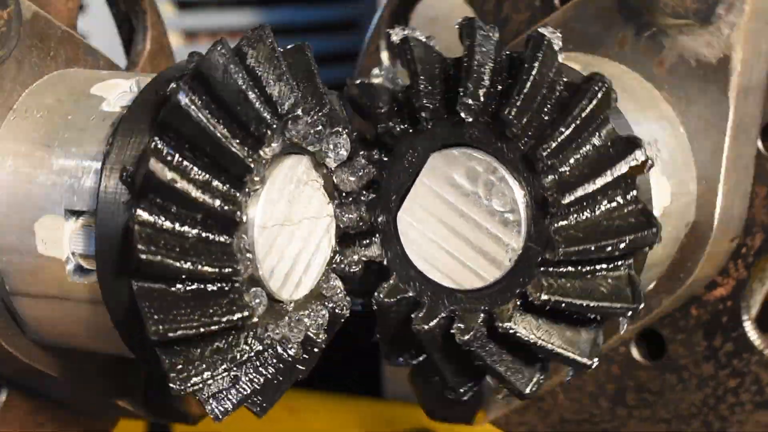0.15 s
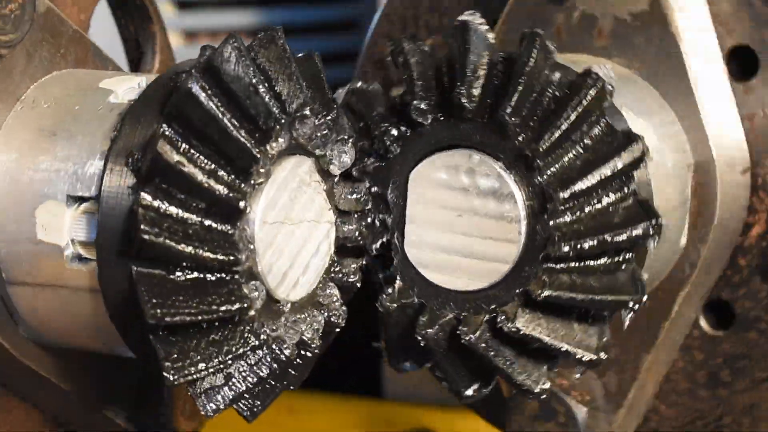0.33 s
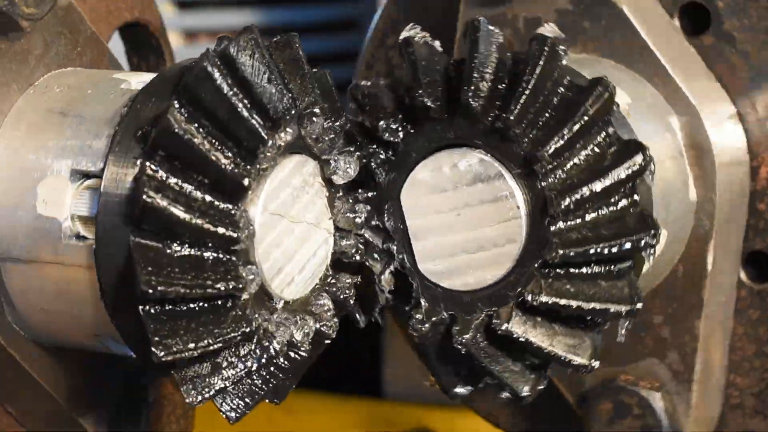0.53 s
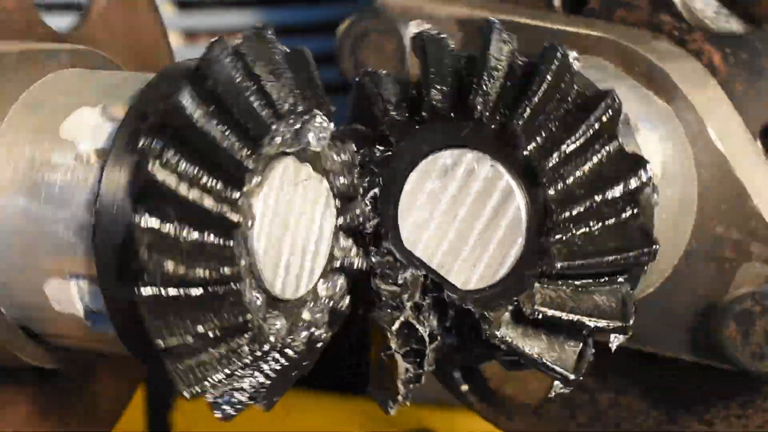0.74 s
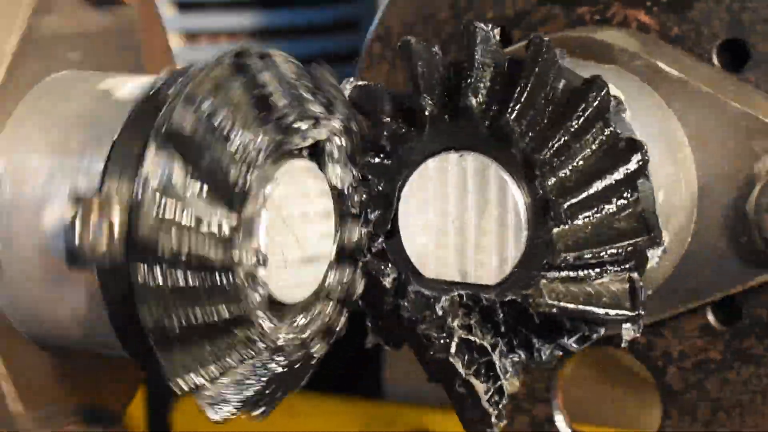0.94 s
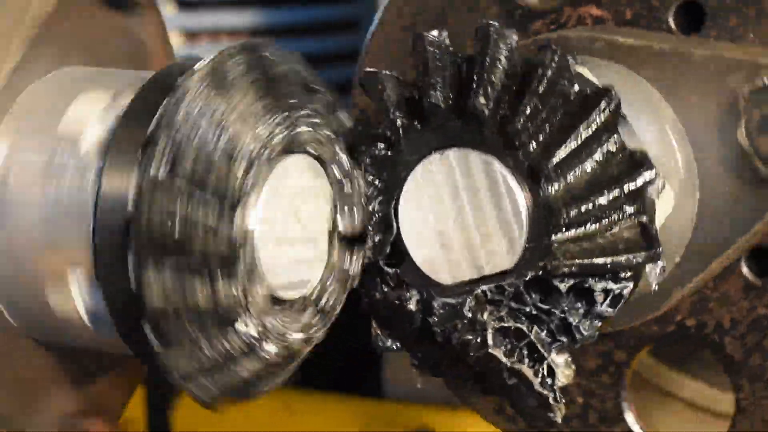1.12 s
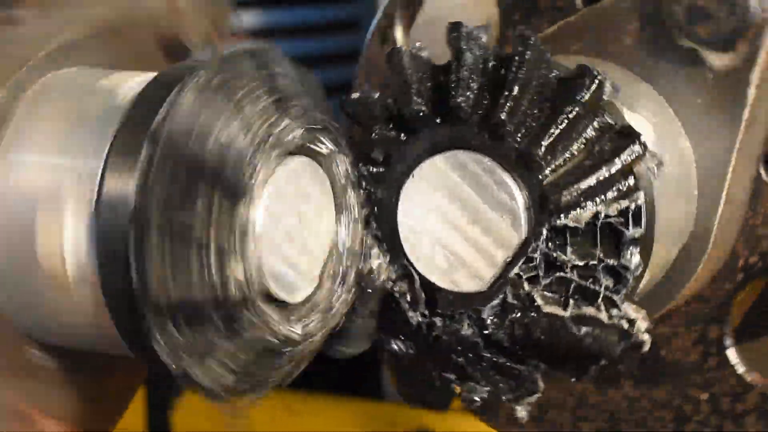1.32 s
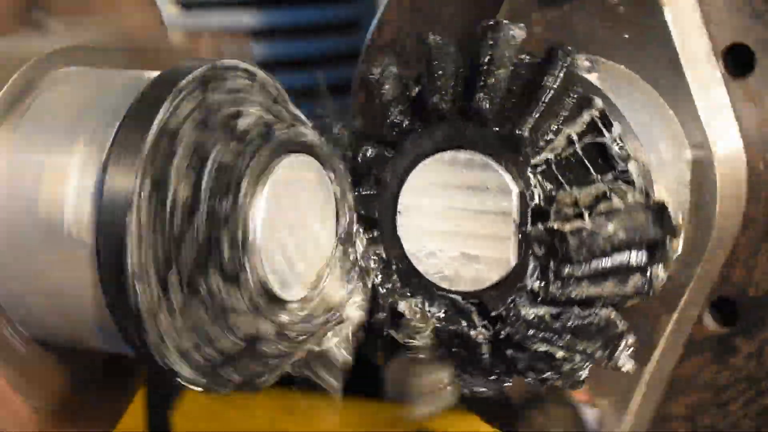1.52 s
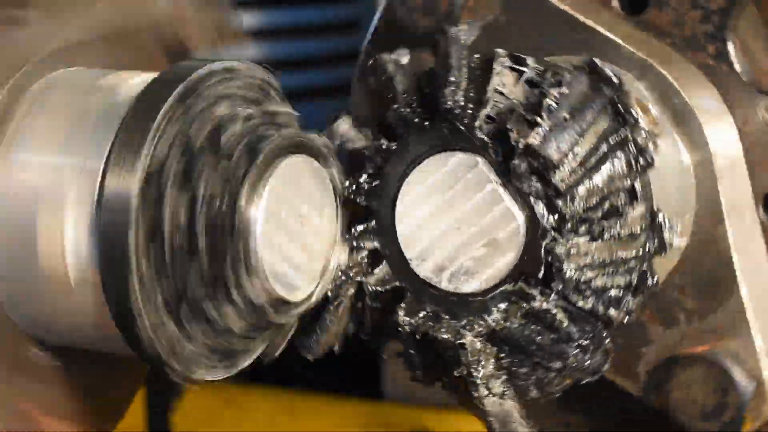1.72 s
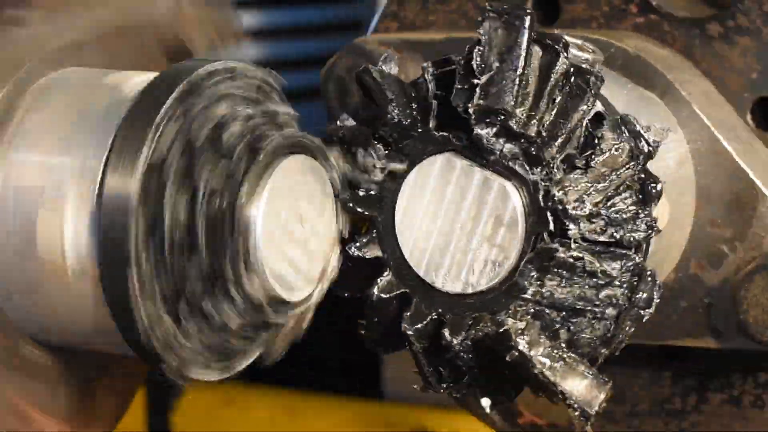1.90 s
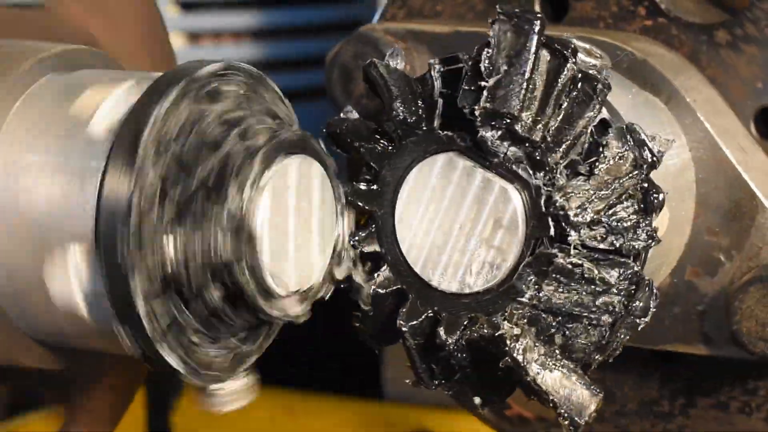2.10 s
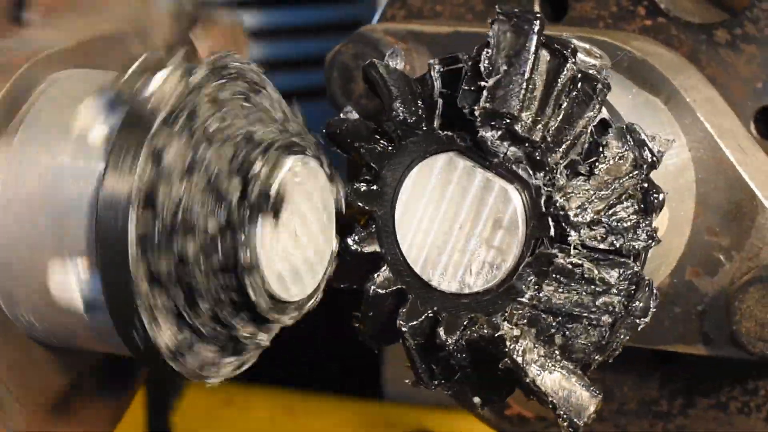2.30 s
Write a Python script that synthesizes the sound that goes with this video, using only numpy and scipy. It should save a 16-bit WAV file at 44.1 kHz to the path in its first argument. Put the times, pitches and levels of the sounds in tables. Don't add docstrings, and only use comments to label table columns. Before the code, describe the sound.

Close-miked gear teeth snap brightly, each crack followed by a short dull thud from the metal frame; the snaps crowd into rough grinding clatter, then fade to weak grazing ticks and hum in a short room echo.

```python
import sys
import numpy as np
from scipy import signal
from scipy.fft import rfft, irfft
from scipy.io import wavfile

SR = 44100
rng = np.random.default_rng(int(sys.argv[2]) if len(sys.argv) > 2 else 0)


def bounce(signal):
    frames = np.transpose(np.atleast_2d(signal))
    limited = np.clip(frames, -1, 1)
    pcm = np.round(limited * 32767).astype(np.int16)
    wavfile.write(sys.argv[1], SR, pcm)


def rack_gain(trim_db):
    fader = np.asarray(trim_db, float)
    return 10 ** (fader / 20)


N = 103635

# (frequency [Hz], level [dB])
AIR_SPECTRUM = [(25, -3), (90, -6), (350, -6.5), (1200, -8.5), (2300, -12.5), (16500, -34)]
AIR_DB = -56.5
# (frequency [Hz], level [dB])
MOTOR_HUM = [(243, -65), (350, -63.5)]
FREE_S, FREE_DB = 1.84, 19
COAST_S, COAST_DB_PER_S = 1.96, 18

# (time [s], frame shaking [dB], grit [dB])
MESH_CHEWING = [(0.198, -76, -77), (0.499, -46, -89), (.66, -50, -46.5), (.72, -24.5, -47.5),
                (.93, -34.5, -43), (1.06, -21.5, -39), (1.13, -34, -46), (1.22, -25, -43),
                (1.3, -25.5, -42), (1.38, -19, -41.5), (1.422, -18, -36), (1.47, -21, -35),
                (1.528, -27.5, -47), (1.618, -24, -35), (1.68, -26, -53), (1.74, -42.5, -53),
                (2.0, -36.5, -63.5), (2.35, -44.5, -66)]
# (frequency [Hz], level under a thud [dB], level under shaking [dB], T60 [s])
FRAME_MODES = [(79, -68, -13.5, 0.9), (178, -34, -26, 1), (207.5, -33, -14.5, 0.58), (247.8, -17, -4, 0.14),
               (319, -18, -6, 0.065), (354.5, -17.5, -1, 0.31), (459, -8.5, -1.5, 0.024),
               (531, -11.5, -5.5, 0.057), (592, -12.5, -5, 0.08), (676.5, -2.5, -7, 0.069),
               (731, -1.5, -27, 0.04), (772, -7, -16, 0.092), (869, -8.5, -19, 0.035),
               (1533, -13.5, -49, 0.026)]
# (time [s], level [dB], pitch [Hz])
SHAFT_LURCHES = [(.535, -38, 350), (0.681, -18.5, 340), (1.072, -29, 360), (1.256, -18, 363),
                 (1.407, -9, 207), (1.645, -13, 198), (1.795, -24, 345), (1.87, -22.5, 253),
                 (1.981, -21, 247), (1.931, -26.5, 245), (1.33, -19.5, 360), (1.561, -22, 352),
                 (2.149, -34, 247), (2.23, -30.5, 243)]
THUD_DELAY_S, THUD_DB, THUD_SOFT_HZ = 0.004087, -1, 1570
JOLTS_PER_S, JOLT_SPREAD_DB, LURCH_WIDTH_HZ = 900, 4, 46

# (frequency [Hz], level [dB])
GRIT_SPECTRUM = [(700, 8.5), (1500, 1.5), (3000, 4), (7000, 9.5), (14000, -7)]
GRAINS_PER_S, GRAIN_SPREAD_DB, GRAIN_CYCLES, GRIT_CLUMP_DB = 3500, 2.5, 7.0, 4.0
GRIT_PITCHES = 20

# (time [s], crack level [dB], colour [Hz],
# thud level [dB])
SNAPPING_TEETH = [(0.2176, -38, 8650, -53), (0.2258, -35, 6400, -57), (0.244, -8, 11100, -20),
                  (0.2653, -12.5, 10000, -47), (0.2743, -23.5, 7060, -38), (0.2838, -14.5, 9100, -28),
                  (0.3422, -34, 6000, -36), (0.3643, -10, 6500, -14), (0.5122, -39.5, 5930, -30),
                  (0.5802, -37.5, 8250, -50), (0.5983, -5.5, 7300, -14.5), (0.6121, -30, 5640, -55),
                  (0.6798, -16, 4960, -11), (0.7015, -25.5, 6330, -27), (0.7622, -13.5, 7700, -19),
                  (0.7896, -10, 9800, -50), (0.7974, -23, 9200, -33), (0.8066, -5.5, 9500, -11.5),
                  (0.852, -4, 7800, -14.5), (0.9072, -7, 8700, -16.5),
                  (0.9599, -14, 7060, -30), (0.9779, -21.5, 5850, -12), (0.9903, -16.5, 8150, -20),
                  (1.0058, -14, 6000, -29), (1.018, -33, 5000, -18), (1.0371, -13, 4570, -10.5),
                  (1.0669, -20, 8400, -18), (1.0732, -26, 8160, -29), (1.0898, -9.5, 9000, -50),
                  (1.1104, -22, 8300, -50), (1.132, -23, 9500, -25), (1.1444, -25, 8300, -23),
                  (1.1571, -12, 9700, -12.5), (1.1621, -13, 6150, -14), (1.181, -21.5, 8250, -15),
                  (1.1947, -6.5, 7800, -12), (1.2548, -18, 6500, -16), (1.2765, -36, 8700, -19.5),
                  (1.2876, -8.5, 6200, -49), (1.3005, -22, 5960, -21), (1.3151, -17.5, 6500, -15),
                  (1.3243, -11, 5450, -16), (1.3349, -23, 4540, -34),
                  (1.404, -30, 7660, -14.5), (1.4175, -39, 9000, -15.5), (1.43, -13, 9700, -13.5),
                   (1.4502, -26, 4400, -16.5), (1.4598, -18, 6360, -31), (1.4673, -10.5, 7400, -21),
                   (1.4793, -27.5, 4320, -24), (1.5144, -29, 3470, -29.5), (1.5515, -22, 6140, -17.5),
                   (1.5696, -9, 5130, -12.5), (1.5728, -17, 6900, -13), (1.5793, -13.5, 9990, -59),
                   (1.5889, -20, 8950, -25), (1.6005, -22, 8000, -36), (1.6065, -17, 8550, -24.5),
                   (1.6194, -27, 8100, -25), (1.6348, -10, 9200, -42), (1.6426, -25, 6900, -36),
                   (1.6463, -19.5, 8000, -18.5),
                  (1.7308, -31, 8050, -48), (1.7355, -27, 5300, -42), (1.7625, -32.5, 7200, -50),
                 (1.7899, -27.5, 4530, -23.5), (1.7996, -16, 6500, -21), (1.8451, -35, 4740, -27),
                 (1.8654, -32, 5700, -28.5), (1.9057, -34, 5840, -66), (1.9128, -31, 5700, -39),
                 (1.9202, -31, 5150, -59), (1.9748, -29.5, 5230, -25.5), (1.9873, -36.5, 3850, -33.5),
                 (2.032, -36.5, 6100, -41), (2.0403, -34, 4900, -52), (2.056, -39, 5270, -97),
                 (2.0822, -27, 6740, -69), (2.1312, -31.5, 7840, -63), (2.1367, -32.5, 6900, -41),
                 (2.2259, -43, 3500, -35), (2.2404, -32.5, 7450, -50), (2.2515, -34, 7900, -45),
                 (2.3401, -44.5, 4960, -52)]
# (time [s], crack level [dB], colour [Hz])
SPLINTERS = [(0.2205, -44, 8900), (0.2441, -27, 1320), (0.5984, -18.5, 1860), (0.7624, -20, 3060),
             (1.1385, -25, 9000), (1.15, -32, 8500), (1.1535, -28, 9000), (0.2375, -43, 6100),
             (0.521, -51, 5000), (0.531, -46, 5000), (0.9975, -36, 9500), (1.0785, -29, 8000),
             (1.0855, -37, 6980), (1.2595, -27, 7000), (1.3655, -25, 4900), (1.3715, -25, 8900),
             (1.375, -31, 9900), (1.392, -35, 9000), (1.3985, -26, 7600), (1.563, -24, 6960),
             (1.566, -19, 8000), (1.5965, -16, 4400), (1.6035, -20.5, 5000), (1.6255, -18, 3970),
             (1.653, -22, 5840), (1.67, -29, 4960), (1.852, -47, 6030), (1.942, -42, 5500)]
# (frequency [Hz], density [dB per Hz])
CRACK_SPECTRUM = [(900, -2), (2600, -1.5), (6700, -7), (13000, -7), (16500, -16.5)]
CRACK_HOLD_S, CRACK_T60_S, CRACK_Q, CRACK_WIDE_DB = 0.0005, 0.008, 3.0, -2.0
CRACK_SAMPLES = 1024

# (frequency [Hz], T60 [s], level [dB])
WORKSHOP = [(216, 0.25, 7.5), (710, 0.38, 4), (1960, 0.37, -1), (5550, 0.29, -6), (8800, 0.25, 0),
            (14900, 0.3, -11)]
BRACKETS_HZ = [2960, 6060, 7160]
BRACKET_Q, BRACKET_DB = 8, -5
ROOM_DB, ROOM_GAP_S = -8.5, 0.0051

# (time [s], level [dB], frequency [Hz], T60 [s])
SKIDS = [(0.37, -38.5, 5300, 0.28), (0.39, -45, 7700, 0.27), (0.61, -32, 5500, 0.34),
         (1.396, -37.5, 1730, 0.38), (2.085, -50, 7100, 0.27), (2.14, -44, 6400, 0.16),
         (2.275, -45, 8100, 0.17), (3, -36, 5500, 0.14), (1.2, -31, 5400, 0.095), (0.86, -24, 11000, 0.079),
         (2.313, -56, 4800, .15)]
SKID_Q, SKID_RISE_S = 14.0, 0.0037

# (frequency [Hz], level [dB], T60 [s])
CHIP_MODES = [
    (2570, -44.5, 0.0054),
    (3470, -42, 0.0024),
    (1355, -62, 0.28),
]
CHIP_S, SCRAPE_DECAY_S = 1.763, 0.008

MIC_LOW_HZ, RECORDER_TOP_HZ, PEAK_LIMIT = 60, 17200, 0.7


def rms_one(x):
    return x / np.sqrt(np.mean(x ** 2) + 1e-20)


def at_hz(points, hz, axis=1):
    p = np.array(points)
    return np.interp(np.log(np.maximum(hz, 1)), np.log(p[:, 0]), p[:, axis])


def colour(x, points):
    size = x.shape[-1]
    gain = rack_gain(at_hz(points, np.fft.rfftfreq(size, 1 / SR)))
    return irfft(rfft(x) * gain, size)


def ring(clicks, hz, t60):
    radius = rack_gain(-60 / (t60 * SR))
    angle = 2 * np.pi * hz / SR
    poles = [1, -2 * radius * np.cos(angle), radius * radius]
    return signal.lfilter([0, np.sin(angle)], poles, clicks + 1e-18)


def soften(x, hz):
    return signal.sosfilt(signal.butter(2, hz, fs=SR, output="sos"), x)


def grains(per_s, spread_db):
    sizes = rack_gain(spread_db * np.minimum(rng.exponential(1, N), 5))
    signs = rng.choice([-1, 1], N)
    return sizes * signs * (rng.random(N) < per_s / SR)


def background():
    t = np.arange(N) / SR
    hum = sum(rack_gain(db) * rms_one(ring(rng.standard_normal(N), hz, 2.5)) for hz, db in MOTOR_HUM)
    unload = rack_gain(FREE_DB * np.clip((t - FREE_S) * 5 + 1, 0, 1))
    coast = rack_gain(-COAST_DB_PER_S * np.maximum(t - COAST_S, 0))
    air = rack_gain(AIR_DB) * rms_one(colour(rng.standard_normal(N), AIR_SPECTRUM))
    return air + unload * coast * hum


def frame(snaps, shake_db):
    thud_at = ((snaps[:, 0] + THUD_DELAY_S) * SR).astype(int)
    luck_db = 3.0 * rng.standard_normal((len(snaps), len(FRAME_MODES)))
    jolts = grains(JOLTS_PER_S, JOLT_SPREAD_DB)
    lurch_s, lurch_db, lurch_hz = np.transpose(SHAFT_LURCHES)
    lurch_at = (lurch_s * SR).astype(int)
    out = 0
    for k, (hz, thud_db, db, t60) in enumerate(FRAME_MODES):
        hail = jolts * rng.uniform(-1.01, 1, N)
        clicks = rack_gain(db + shake_db) * hail / ring(hail, hz, t60).std()
        clicks[thud_at] += rack_gain(snaps[:, 3] + THUD_DB + thud_db + luck_db[:, k]) * (-1) ** k
        clicks[lurch_at] += rack_gain(lurch_db + db) / (1 + ((hz - lurch_hz) / LURCH_WIDTH_HZ) ** 2)
        out = out + ring(clicks, hz, t60)
    no_drift = signal.lfilter([1, -1], [1, -0.97], out)
    return soften(no_drift, THUD_SOFT_HZ)


def grit(grit_db):
    clumps = rms_one(soften(rng.standard_normal(N), 37))
    ticks = grains(GRAINS_PER_S * rack_gain(GRIT_CLUMP_DB * clumps), GRAIN_SPREAD_DB)
    dealt = rng.integers(0, GRIT_PITCHES, N)
    out = 0
    for k, hz in enumerate(np.geomspace(700, 15000, GRIT_PITCHES)):
        level = rack_gain(at_hz(GRIT_SPECTRUM, hz)) * np.sqrt(hz)
        out = out + level * ring(ticks * (dealt == k), hz, GRAIN_CYCLES / hz)
    return rack_gain(grit_db) * rms_one(out)


def cracks(snaps):
    out = np.zeros((2, N + CRACK_SAMPLES))
    t = np.arange(CRACK_SAMPLES) / SR
    shape = np.minimum(t * 8000, 1) * rack_gain(-60 * np.maximum(t - CRACK_HOLD_S, 0) / CRACK_T60_S)
    shape = shape + rack_gain(-11 - 60 * t / 0.026)
    noise = colour(rng.standard_normal((len(snaps), CRACK_SAMPLES)), CRACK_SPECTRUM)
    pulse = np.roll(colour(1.0 * (t == 0), CRACK_SPECTRUM), 64)
    for (s, db, hz, *_), splintering in zip(snaps, noise):
        high_pass = signal.butter(3, hz / 2.14, "high", fs=SR)
        wide = signal.lfilter(*high_pass, [splintering, pulse])
        own = signal.lfilter(*signal.iirpeak(hz, CRACK_Q, SR), wide)
        burst, clean = [rms_one(o) + rack_gain(CRACK_WIDE_DB) * rms_one(w) for o, w in zip(own, wide)]
        burst = shape * burst
        burst = burst / burst[:120].std()
        to_walls = 0.8 * rms_one(clean) * burst.std() + burst / 4
        start = int(s * SR)
        out[:, start:start + CRACK_SAMPLES] += rack_gain(db) * np.array([burst, to_walls])
    return out[:, :N]


def shop(x):
    size = SR // 2
    edges = 60 * 2 ** np.arange(0, 8.3, 0.5)
    t = np.arange(size) / SR
    white = rng.standard_normal((2, size))
    tail = 0
    for k, (low, high) in enumerate(zip(edges, edges[1:])):
        hz = np.sqrt(low * high)
        band_pass = signal.butter(2, [low, high], "band", fs=SR, output="sos")
        band = signal.sosfilt(band_pass, white[k % 2])
        tail = tail + band * rack_gain(at_hz(WORKSHOP, hz, axis=2) - 60 * t / at_hz(WORKSHOP, hz))
    steel = sum(signal.lfilter(*signal.iirpeak(hz, BRACKET_Q, SR), tail) for hz in BRACKETS_HZ)
    tail = tail + rack_gain(BRACKET_DB) * steel
    tail = tail * np.clip(t / ROOM_GAP_S - 1, 0, 1)
    tail = tail / np.sqrt(np.sum(white[0] ** 2) / 20)
    return rack_gain(ROOM_DB) * signal.fftconvolve(x, tail)[:N]


def skids():
    t, out = np.arange(N) / SR, 0
    for s, db, hz, t60 in SKIDS:
        late = np.maximum(t - s, 0)
        hiss = rms_one(signal.lfilter(*signal.iirpeak(hz, SKID_Q, SR), rng.standard_normal(N)))
        out = out + hiss * np.minimum(late / SKID_RISE_S, 1) * rack_gain(db - 60 * late / t60)
    return out


def chip():
    late = np.arange(N) / SR - CHIP_S
    scrape = rng.standard_normal(N) * (late > 0) * np.exp(-np.abs(late) / SCRAPE_DECAY_S)
    return sum(rack_gain(db) * ring(scrape, hz, t60) for hz, db, t60 in CHIP_MODES)


def scene():
    t = np.arange(N) / SR
    snaps = np.array(SNAPPING_TEETH)
    chew_s, shake, gritty = np.transpose(MESH_CHEWING)
    shake_db = np.interp(t, chew_s, shake, -90) - 7.0
    grit_db = np.interp(t, chew_s, gritty, -90) + 10.7
    near, far = cracks(snaps) + cracks(SPLINTERS)
    rig = frame(snaps, shake_db) + grit(grit_db) + skids() + chip()
    return (near + rig + shop(far + rig) + background())[None]


def top_cut(x):
    return signal.sosfilt(signal.butter(12, 16970, fs=SR, output="sos"), x)


def record(dry):
    rounded = PEAK_LIMIT * np.tanh(dry / PEAK_LIMIT)
    low_pass = signal.cheby2(10, 60, RECORDER_TOP_HZ, fs=SR, output="sos")
    high_pass = signal.butter(3, MIC_LOW_HZ, "high", fs=SR, output="sos")
    mix = signal.sosfilt(high_pass, signal.sosfilt(low_pass, rounded))
    return top_cut(mix)


dry = scene()
out = record(dry)
bounce(out)
```